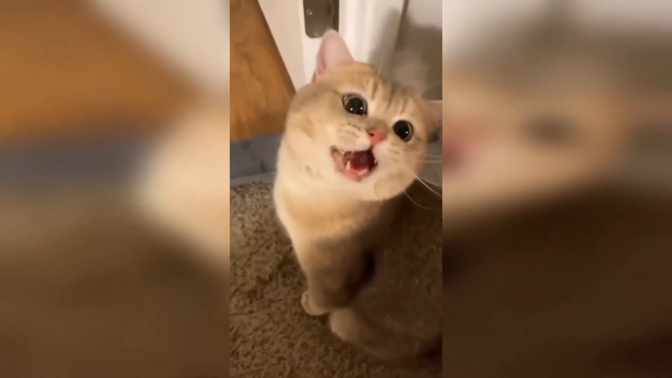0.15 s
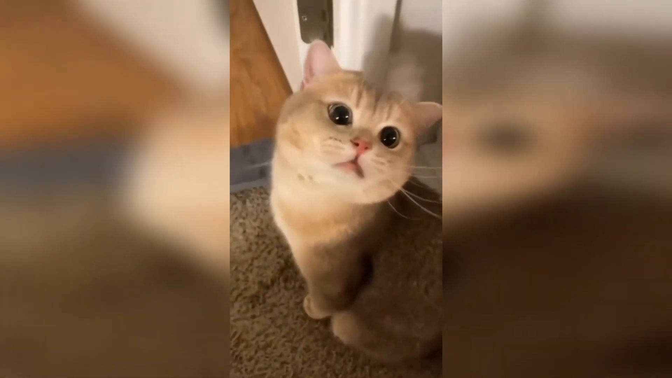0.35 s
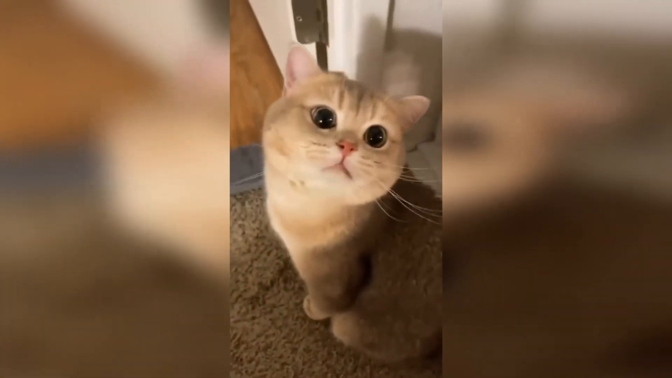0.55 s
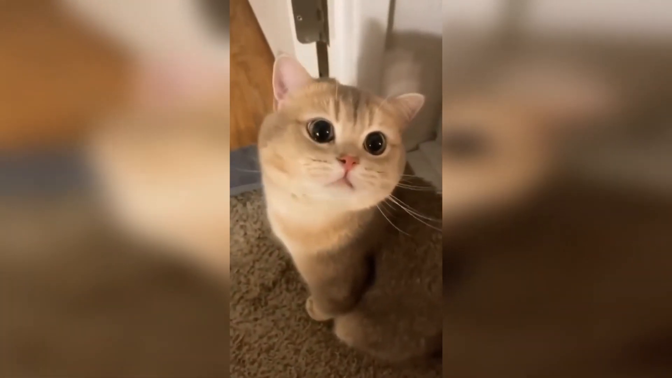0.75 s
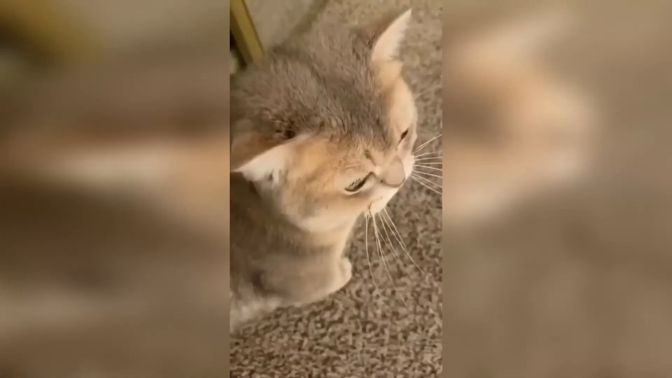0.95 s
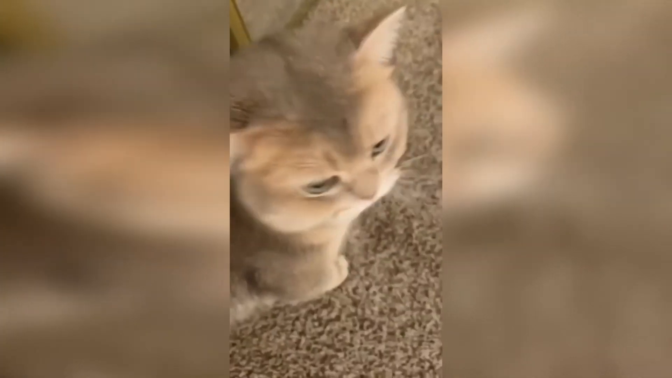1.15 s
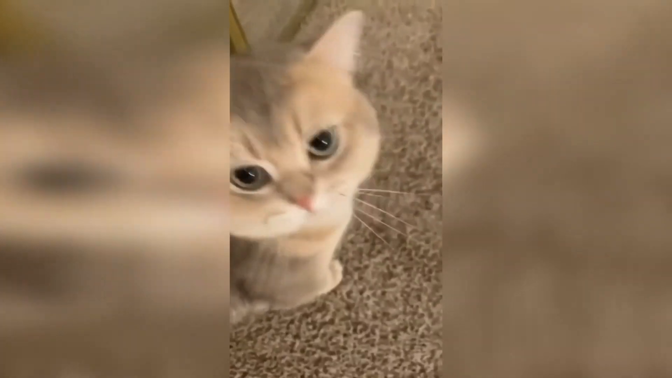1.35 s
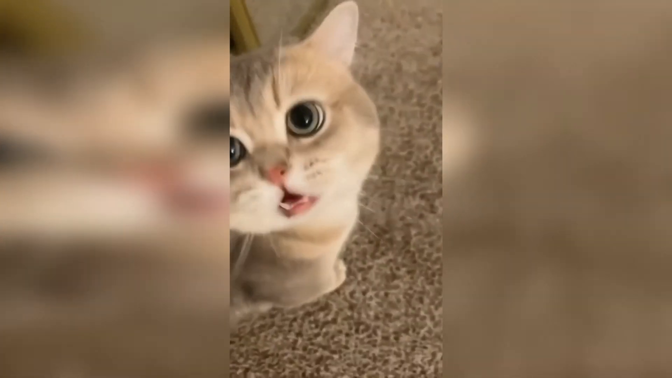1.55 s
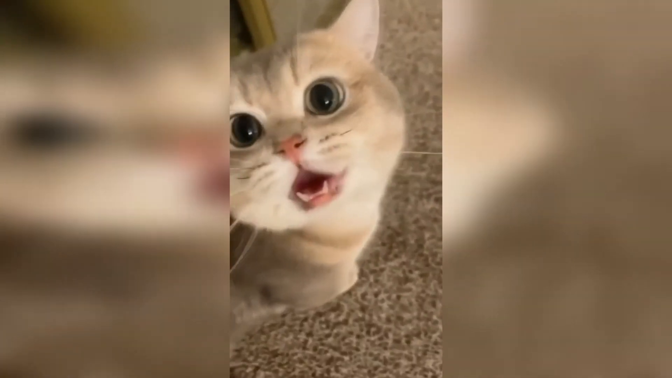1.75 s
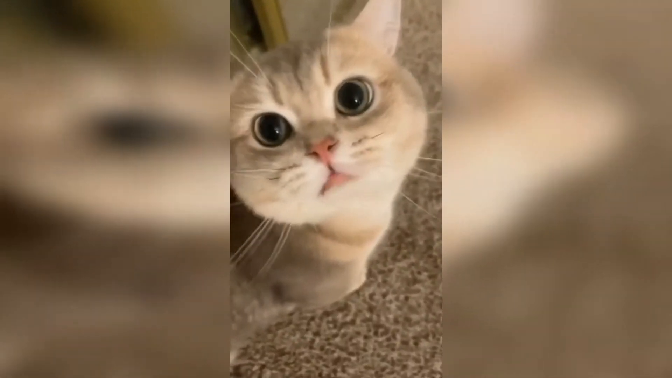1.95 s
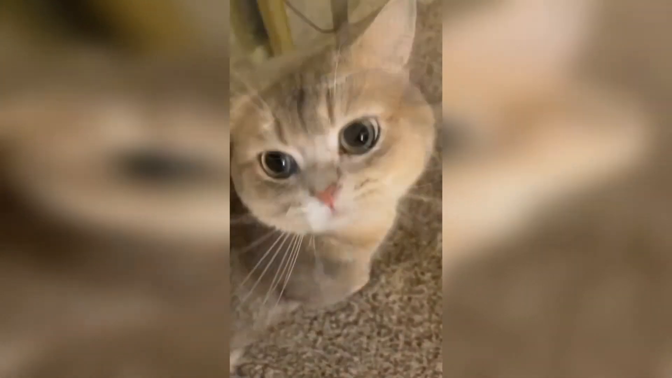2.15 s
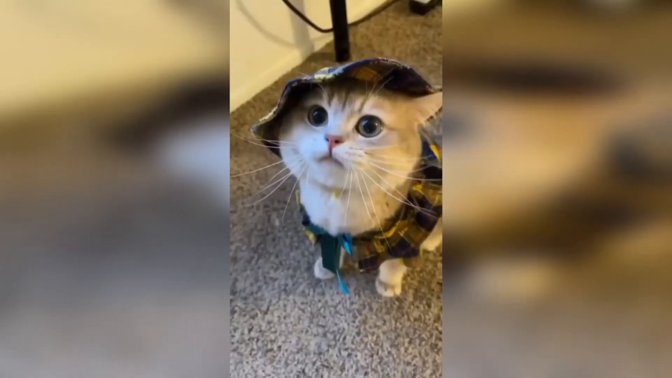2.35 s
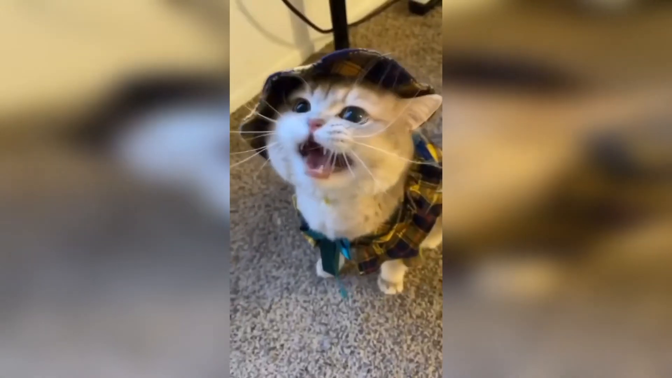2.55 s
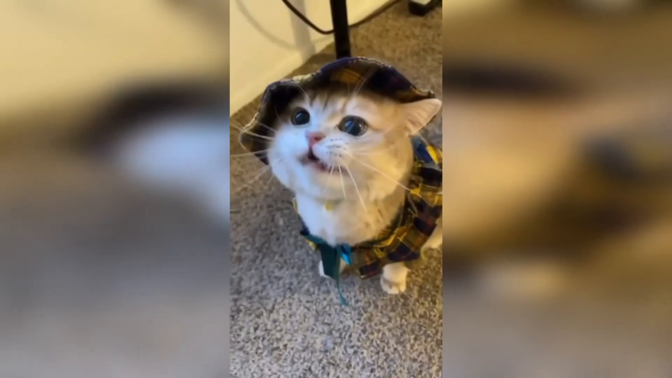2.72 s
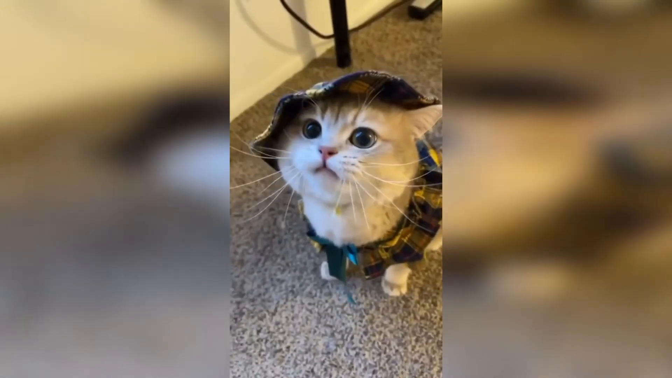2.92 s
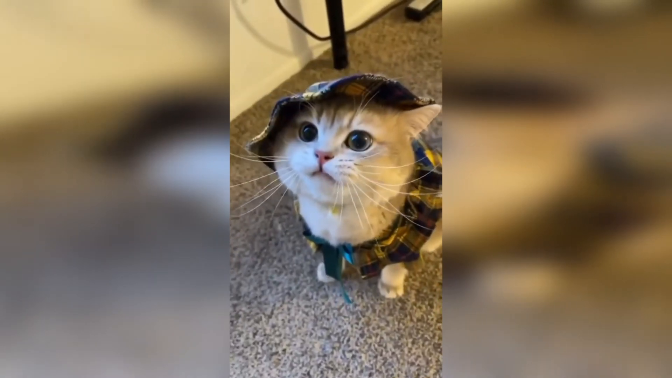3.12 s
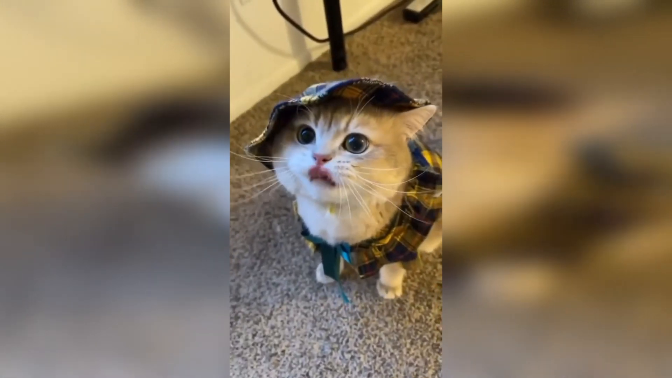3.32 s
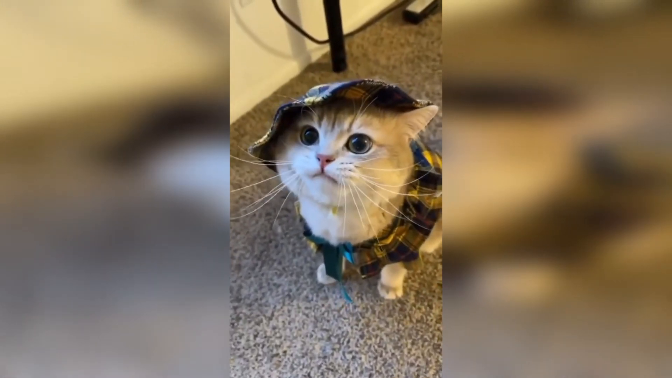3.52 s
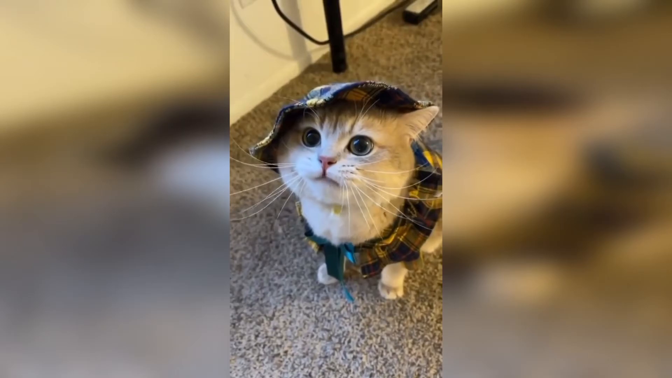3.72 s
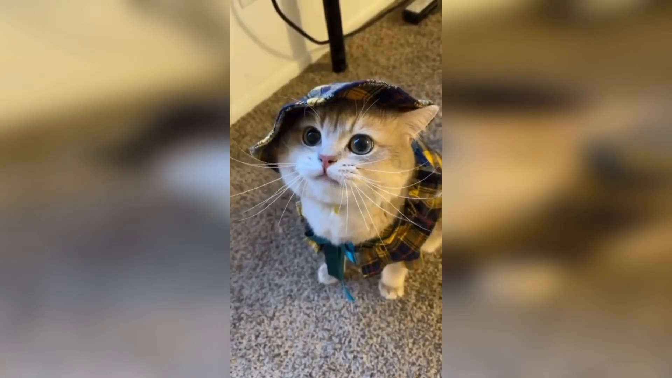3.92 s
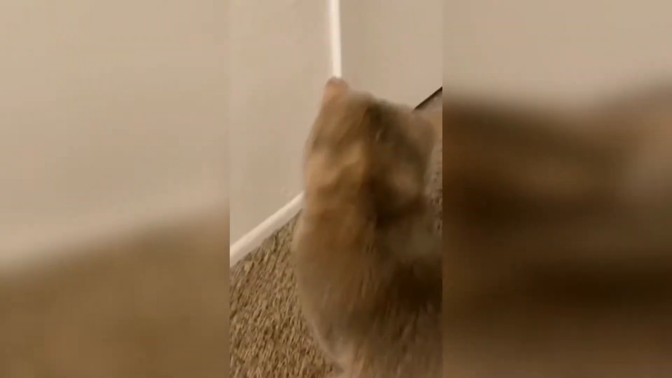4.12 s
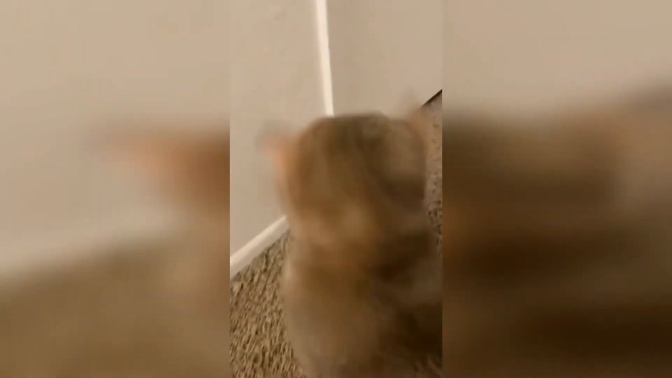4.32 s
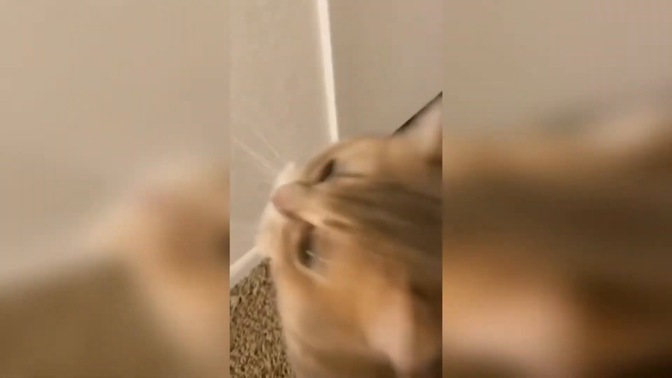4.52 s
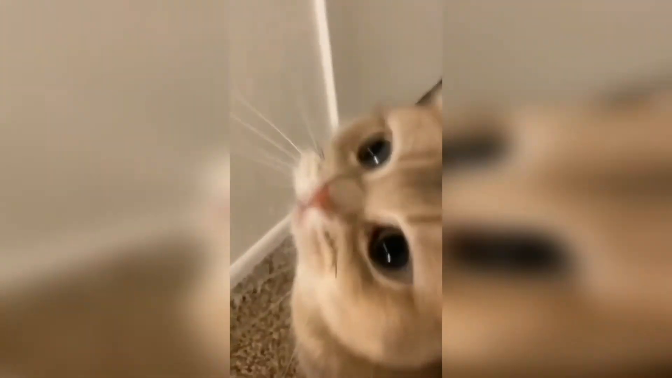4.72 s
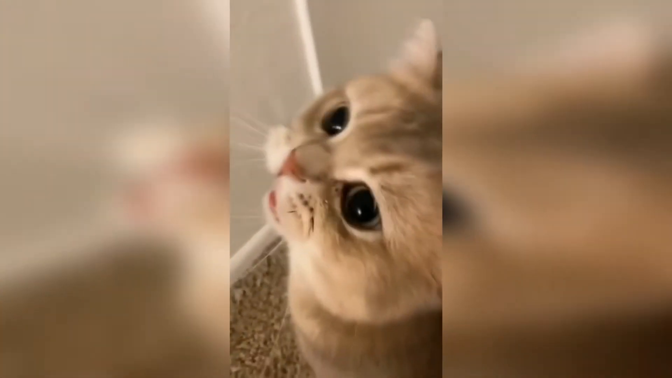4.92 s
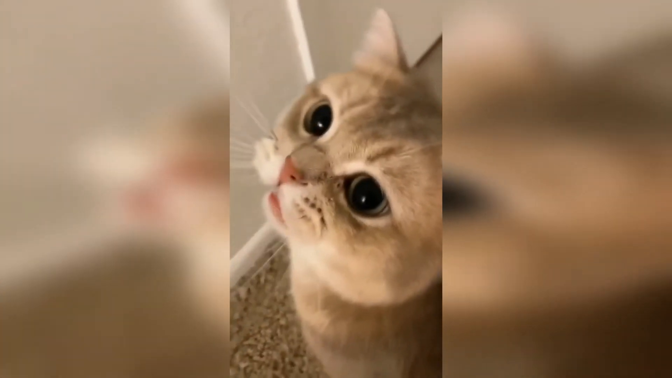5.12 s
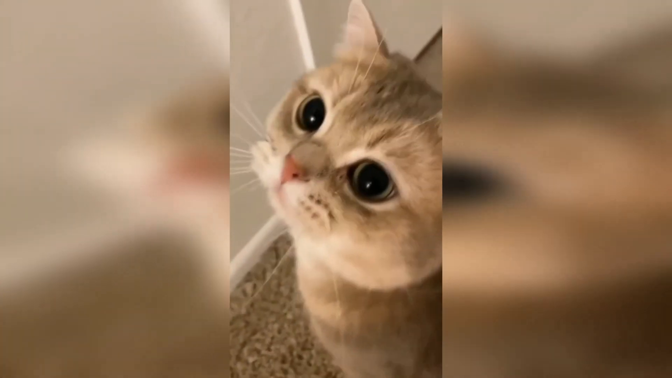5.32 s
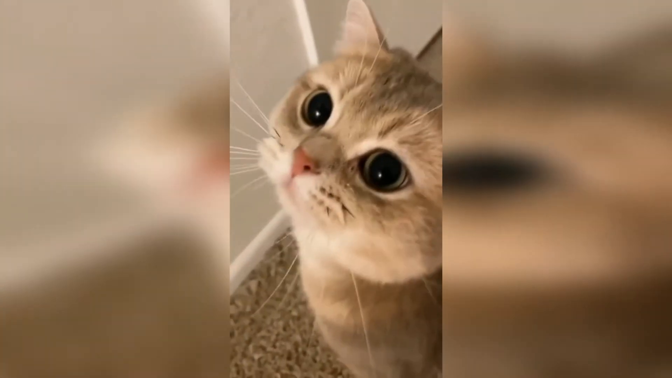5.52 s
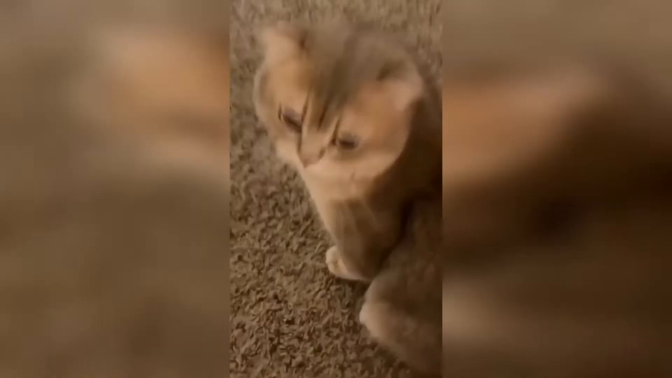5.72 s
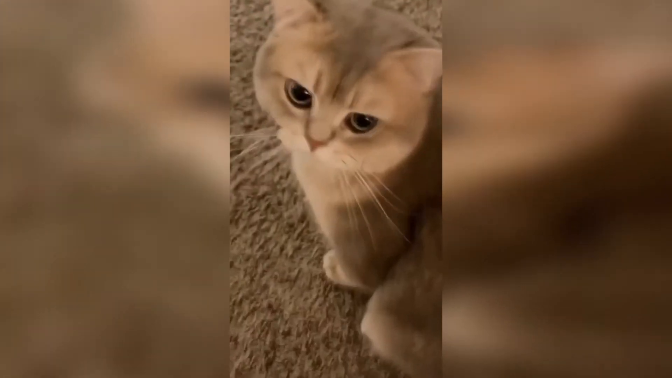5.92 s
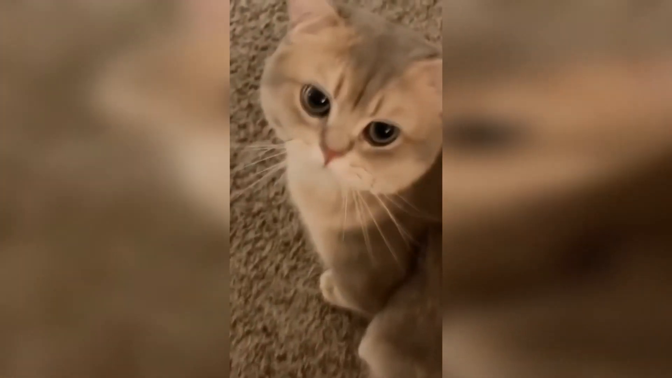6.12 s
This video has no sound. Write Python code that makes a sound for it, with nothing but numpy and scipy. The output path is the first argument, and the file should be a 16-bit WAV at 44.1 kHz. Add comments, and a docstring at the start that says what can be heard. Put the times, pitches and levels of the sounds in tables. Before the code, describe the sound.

Five close cat meows in small carpeted rooms, trilled and slightly raspy, with rumble, hiss, motor hum and tiny ticks between calls.

```python
"""A cat close to a phone meows five times, trilling in all but the first call.
Vocal folds give a stack of partials shaped by throat, nose and opening mouth, with flutter and rasp.
Each call sits in another carpeted room, with hard cuts between; each room has its own rumble,
hiss and hum. Small ticks of tongue, lips and claws fall mostly between the calls; a short dull echo follows."""
import sys
import numpy as np
from scipy import signal
from scipy.fft import rfft, irfft
from scipy.io import wavfile
from scipy.ndimage import uniform_filter1d

SR = 44100
rng = np.random.default_rng(int(sys.argv[2]) if len(sys.argv) > 2 else 0)


def boost_factor(decibels):
    """Convert a level in decibels to a linear amplitude factor."""
    exponent = np.asarray(decibels, float) / 20
    return 10 ** exponent


def transcribe(u):
    """Save the signal u as a 16-bit wav file named by the first command-line argument.

    u: samples, shape (n,) or (channels, n), limited to [-1, 1]; the rate is SR.
    q: integer samples, one column per channel.
    """
    v = np.clip(np.atleast_2d(u).T, -1, 1)
    q = np.round(v * 32767).astype(np.int16)
    wavfile.write(sys.argv[1], SR, q)


N = 276066
T = np.arange(N) / SR


def colour(points, hz):
    """dB of a spectrum at the given frequencies, interpolated over log frequency."""
    f, db = np.transpose(points)
    return np.interp(np.log(np.maximum(hz, 1)), np.log(f), db)


def noise(points, size):
    """Noise of the given spectrum, rms 1."""
    gain = boost_factor(colour(points, np.fft.rfftfreq(size, 1 / SR)))
    y = irfft(rfft(rng.standard_normal(size)) * gain, size)
    return y / np.std(y)


def walk(rate_hz, size):
    """Smooth random curve changing about rate_hz times a second, spread 1."""
    k = int(SR / rate_hz)
    y = uniform_filter1d(uniform_filter1d(rng.standard_normal(size), k), k)
    return y / np.std(y)


def fade(t, start_s, end_s, rise_s, fall_s):
    """Linear gate from start to end."""
    return np.clip((t - start_s) / rise_s, 0, 1) * np.clip((end_s - t) / fall_s, 0, 1)


def tone(rows):
    """Low sine following rows of (time_s, pitch_hz, level_db), wavering in both."""
    s, hz, db = np.transpose(rows)
    pitch_hz = np.interp(T, s, hz) + 1.9 * walk(15, N)
    phase = 2 * np.pi * np.cumsum(pitch_hz) / SR
    level = np.sqrt(2) * boost_factor(np.interp(T, s, db) + 2.9 * walk(14, N))
    return level * np.sin(phase) * fade(T, s[0] - .02, s[-1] + 0.0199, 0.026, 0.023)


BEATING_HZ, BEATS_PER_S, WEAKER_RATIO = 57.2, 2.35, .6


def beating(start_s, end_s, first_db, last_db, crest_s):
    """Rows for tone(): a hum whose level beats as two unequal motors drift in and out of step."""
    s = np.arange(start_s, end_s, .01)
    beat = np.abs(1 + WEAKER_RATIO * np.exp(2j * np.pi * BEATS_PER_S * (s - crest_s)))
    level_db = np.interp(s, [start_s, end_s], [first_db, last_db]) + 20 * np.log10(beat)
    return np.c_[s, BEATING_HZ + 0 * s, level_db]


# rooms: start_s, end_s
ROOM_SPANS = [(0, .845), (.85, 2.11), (2.112, 3.987), (3.988, 5.636), (5.64, 6.3)]
# cut-off time per room: fall_s
CUT_S = [.003, .003, .0003, .001, .001]
# steady noise spectrum per room: freq_hz, relative_db
ROOM_NOISE = [
    [(15, -47.5), (25, -18), (55, -5), (155, -15), (201, -26), (339, -15), (543, -34), (651, -35),
     (742, -44.5), (1220, -37), (1580, -45.5), (4980, -64.5), (6470, -39.5), (8840, -83), (12700, -65),
     (16600, -99.5), (22000, -120)],
    [(15, -46), (25, -20.5), (129, -0.5), (298, -21), (377, -14.5), (651, -40.5), (963, -27), (2160, -47),
     (2730, -38), (4850, -52), (11800, -48), (12700, -51), (16600, -85.5), (22000, -120)],
    [(15, -51.5), (25, -17.5), (42, -1.5), (64, -2), (136, -16.5), (236, -20), (306, -41), (348, -39),
     (587, -56), (5390, -68.5), (10900, -68), (12700, -72.5), (16600, -104), (22000, -120)],
    [(15, -18), (25, -19), (48, 5.5), (85, -8.5), (123, 5.5), (151, -13.5), (242, -14.5), (290, -25),
     (358, -23.5), (4370, -59), (7370, -66.5), (12700, -67), (16600, -101), (22000, -120)],
    [(15, -38), (25, -9), (123, -1.5), (212, -12.5), (298, -3.5), (515, -15.5), (1280, -25), (1460, -24),
     (3040, -30.5), (4980, -46), (11200, -40.5), (12700, -52), (16600, -87.5), (22000, -120)],
]
# noise levels per room: rumble_first_db, rumble_last_db (both at 68-104 Hz), hiss_first_db, hiss_last_db
ROOM_DB = [(-47, -44.5, -46, -49), (-62, -64, -59, -66), (-47, -49.5, -60, -57.5), (-43, -45, -48.5, -51.5),
           (-52, -50, -48.5, -49.5)]
# appliance tones per room: freq_hz, level_db, waver_db; motors near 53 and 59 Hz beat in the fourth
HUM = [
    [(352, -53, 4.)],
    [(120, -54, 4.5)],
    [],
    [(53, -37.5, 1.5), (59.5, -33, 0.6), (105, -55, 6), (120, -58, 1.5), (120.2, -32.5, 0), (180, -48, 1.1),
     (237.8, -44, 1.6), (305, -57.5, 1), (361, -53, 2.1), (534, -60, 3.), (590, -60.5, 4.5)],
    [(118.5, -56.5, 3.)],
]
# motor hum of the first and third rooms: start_s, end_s, first_db, last_db, crest_s
BEATING_HUM = [(0, .845, -38, -38.5, .05), (2.112, 3.987, -35, -42, 2.31)]
# low passing tone: time_s, pitch_hz, level_db
DRONE = [(2.2, 157, -44), (2.3, 152, -42.5), (2.7, 152.6, -42.5), (2.85, 159.4, -48.5), (3.1, 159.6, -58.5)]
IN_STEP_S = 4.24  # appliance tones all crest here
RUMBLE_WALK_DB, HISS_WALK_DB = 2.5, 2
# a soft shuffle lifts the second room's noise
SHUFFLE_S, SHUFFLE_LENGTH_S, SHUFFLE_DB, SHUFFLE_HISS_DB = 1.08, .07, 17, 6


def rooms():
    """Rumble and hiss as split noise, appliance tones as sines; each room but the first fades in."""
    out = np.zeros(N)
    low = signal.butter(4, 260, fs=SR, output="sos")
    gauge = signal.butter(4, [68, 104], "band", fs=SR, output="sos")
    shuffle = np.exp(-((T - SHUFFLE_S) / SHUFFLE_LENGTH_S) ** 2)
    swelling = sum(tone(rows) for rows in [beating(*hum) for hum in BEATING_HUM] + [DRONE])
    for room, ((start, end), points, levels) in enumerate(zip(ROOM_SPANS, ROOM_NOISE, ROOM_DB)):
        inside = (T >= start) & (T < end)
        t = T[inside]
        air = noise(points, len(t))
        rumble = signal.sosfiltfilt(low, air)
        hiss = air - rumble
        rumble_db = np.interp(t, [start, end], levels[:2]) + SHUFFLE_DB * shuffle[inside]
        rumble_db += RUMBLE_WALK_DB * walk(5, len(t))
        hiss_db = np.interp(t, [start, end], levels[2:]) + SHUFFLE_HISS_DB * shuffle[inside]
        hiss_db += HISS_WALK_DB * walk(12, len(t))
        sound = swelling[inside]
        for hz, db, waver_db in HUM[room]:
            level = np.sqrt(2) * boost_factor(db + waver_db * walk(8, len(t)))
            sound += level * np.cos(2 * np.pi * hz * (t - IN_STEP_S))
        sound += boost_factor(rumble_db) * rumble / np.std(signal.sosfiltfilt(gauge, air))
        sound += boost_factor(hiss_db) * hiss / np.std(hiss)
        out[inside] = sound * fade(t, start - (room == 0), end, 0.022, CUT_S[room])
    return out


# echo per call: send_db
ECHO_DB = [-24, -27.5, -26.5, -25.5, -28]
ECHO_T60_S, SEND_WALK_HZ, TICK_ECHO_DB = .24, 45, -26


def echo(calls, clicks):
    """Walls as a decaying noise tail; calls are randomly modulated first, so their tails sound diffuse."""
    t = T[:SR // 2]
    tail = noise([(150, -6.5), (500, 0.5), (3000, -4), (12000, -20.5)], len(t))
    tail = tail * boost_factor(-60 * t / ECHO_T60_S) * (t > .004)
    sent = sum(boost_factor(db) * call for db, call in zip(ECHO_DB, calls)) * walk(SEND_WALK_HZ, N)
    sent = sent + boost_factor(TICK_ECHO_DB) * clicks
    return signal.fftconvolve(sent, tail / np.sqrt(np.sum(tail ** 2)))[:N]


# ticks of tongue, lips and claws: start_s, level_db, centre_hz, width_hz, rustle_db (against level)
TICKS = [(1.034, -40, 1000, 1000, -9), (1.0859, -29, 1370, 2202, -13), (1.9754, -34, 2480, 2539, -21.5),
         (2.0263, -44, 2210, 2000, -16.5), (2.345, -11.5, 5500, 8020, -12),
         (3.2364, -44.5, 2500, 2990, -19.5), (3.2542, -38.5, 2370, 2600, -12),
         (3.4336, -44, 3974, 4996, -20), (3.4578, -24.5, 10500, 2996, -16),
         (3.4589, -37, 5850, 7130, -23.5), (3.5622, -44.5, 3000, 4000, -14), (3.5863, -49, 10500, 3000, -9),
         (3.6355, -41.5, 2774, 3570, -13.5), (3.7354, -48, 6460, 2000, -3), (3.7681, -38, 6530, 3950, -13),
         (3.7845, -29.5, 2630, 2335, -14), (3.7944, -29, 7670, 6890, -12), (4.654, -22, 6027, 8910, -4),
         (5.2852, -42, 2000, 2525, -22), (5.3034, -30.5, 3010, 3503, -19), (5.8322, -49, 2795, 2600, 4),
         (6.123, -49.5, 6000, 9000, 2)]
SNAP_DECAY_S, SNAP_RISE_S, RUSTLE_T60_S = 0.0017, 0.0015, 0.12
KNOCK_HZ, KNOCK_DB, KNOCK_T60_S = 2100, -5.5, 0.02


def ticks():
    """Band noise as a sharp snap and short rustle; a damped knock rings in ticks centred at 1.8-3.3 kHz."""
    out, t = np.zeros(N + SR), T[:SR // 4]
    knock = boost_factor(KNOCK_DB - 60 * t / KNOCK_T60_S) * np.sin(2 * np.pi * KNOCK_HZ * t)
    snap = np.exp(-t / SNAP_DECAY_S) * np.minimum(t / SNAP_RISE_S, 1) * 1.5
    for s, db, hz, width_hz, rustle_db in TICKS:
        band_hz = [max(hz - width_hz / 2, 500), min(hz + width_hz / 2, 15000)]
        sos = signal.butter(2, band_hz, "band", fs=SR, output="sos")
        grain = signal.sosfilt(sos, rng.standard_normal(len(t)))
        rustle = boost_factor(rustle_db - 60 * t / RUSTLE_T60_S + 3.5 * walk(60, len(t)))
        click = (snap + rustle) * grain / np.std(grain) / 2 + knock * (1800 < hz < 3300)
        i = int(s * SR)
        out[i:i + len(t)] += boost_factor(db) * click
    return out[:N]


# the jaw raises the throat resonance
THROAT_SHUT_HZ, THROAT_WIDE_HZ, THROAT_Q, THROAT_TOP_HZ = 330, 1320, 2.3, 1750
FOLD_TILT_DB_PER_OCT = 3
# the nose swallows this band; the notch fills over the last part of the jaw's drop
NOTCH_HZ, NOTCH_WIDTH_HZ, NOTCH_DB, NOTCH_GONE_JAW = 1520, 420, -22, 0.36


def throat(k, hz, jaw):
    """Gain of partial k: fold tilt, throat resonance with a steep top, nasal notch."""
    ratio = k * hz / (THROAT_SHUT_HZ * (THROAT_WIDE_HZ / THROAT_SHUT_HZ) ** jaw)
    notch_db = NOTCH_DB * np.clip((1 - jaw) / NOTCH_GONE_JAW, 0, 1)
    notch_db = notch_db / (1 + (2 * (k * hz - NOTCH_HZ) / NOTCH_WIDTH_HZ) ** 2)
    top = np.hypot(1, (k * hz / THROAT_TOP_HZ) ** 6)
    tilt_db = FOLD_TILT_DB_PER_OCT * np.log2(k)
    return boost_factor(tilt_db + notch_db) / np.hypot(1 - ratio ** 2, ratio / THROAT_Q) / top


# trills: first_s, last_s, period_ms, first_depth_db, last_depth_db
TRILLS = [(1.234, 1.4, 32.5, 13, 5), (2.209, 2.3, 18, 8, 3), (2.449, 2.63, 25.5, 3.5, 5),
          (4.441, 4.6, 22.1, 11, 6), (6.028, 6.149, 23.6, 10, 6)]
# single catches of the voice: time_s, depth_db, length_ms
CATCHES = [(2.3383, 5, 7.5), (4.368, 8, 14), (4.429, 10.5, 10.6), (5.1102, 3.5, 9.8), (5.1429, 13, 4.2)]
TRILL_DUTY, TRILL_SCATTER = .42, .3  # share of the period; unevenness of depth


def falter(t):
    """Depth in dB by which the folds falter: bell-shaped dips, steady in trills, single in catches."""
    db = sum(depth * np.exp(-(2 * (t - at) * 1000 / ms) ** 2) for at, depth, ms in CATCHES)
    uneven = np.maximum(1 + TRILL_SCATTER * walk(40, len(t)), 0)
    for first, last, ms, *depths in TRILLS:
        beat = (t - first) * 1000 / ms
        within = (beat > -.5) & (t < last + ms / 2000)
        dip = np.exp(-(2 * (beat - np.round(beat)) / TRILL_DUTY) ** 2)
        db = db + within * uneven * np.interp(t, [first, last], depths) * dip
    return db


# upper tract, lips shut: freq_hz, relative_db
NOSE = [(1650, -32.5), (2800, -2), (3080, -11), (3770, -13.5), (4340, -1.5), (4890, -15), (6300, -14.5),
        (6420, -12), (8070, -24.5), (9890, -18), (12700, -26), (16600, -56), (22000, -120)]
SHUT_DB, OPEN_DB = -23.5, -8  # mouth level at which the lips count as shut, open
MOUTH_OPEN_WIDTH_HZ, MOUTH_SKIRT, SHUT_WIDEN = 415, 1.96, 0.44
# second resonance, offset above the mouth's; shut lips lower it further
SECOND_ABOVE_HZ, SECOND_DB, SECOND_SHUT_DB = 650, -15, -14
NASAL_HZ, NASAL_WIDTH_HZ, NASAL_DB = 1080, 760, -14.5  # rings behind shut lips
FLUTTER_LIFT_PER_DB, JITTER, SHIMMER_DB = .012, .015, 3  # the last two at full hoarseness
RASP_HZ, AIR_HZ, RASP_GROWTH, RASP_START = 248, 550, 0.34, .75  # smear rates; growth per partial
FALTER_BASE, FALTER_GROWTH = 0.64, 0.05  # share of the falter depth; growth per partial


def meow(start, end, rows, rasp, bright, treble):
    """Partials of the folds through throat and mouth; they falter in trills and smear into rasp if hoarse."""
    inside = (T >= start) & (T <= end)
    t = T[inside]
    size = len(t)
    s, *columns = np.transpose(rows)
    hz, level_db, jaw, mouth_hz, mouth_db = (np.interp(t, s, c) for c in columns)
    hoarse = np.interp(t, *np.transpose(rasp))
    treble_db = np.interp(t, *np.transpose(bright))
    opening = np.clip((mouth_db - SHUT_DB) / (OPEN_DB - SHUT_DB), 0, 1)
    shut = 1 - opening
    falter_db = falter(t)
    low = np.hypot(throat(1, hz, jaw), throat(2.02, hz, jaw))  # reference for level_db
    pitch_hz = hz * (1 + FLUTTER_LIFT_PER_DB * falter_db + JITTER * hoarse * walk(150, size))
    phase = 2 * np.pi * np.cumsum(pitch_hz) / SR
    shimmer = boost_factor(SHIMMER_DB * hoarse * walk(220, size))
    width_hz = MOUTH_OPEN_WIDTH_HZ * (1 + SHUT_WIDEN * shut)
    resonances = ((0, 0), (SECOND_ABOVE_HZ, SECOND_DB + SECOND_SHUT_DB * shut))
    voice = 0
    for k in range(1, 36):
        f = k * hz
        mouth = 0
        for above_hz, db in resonances:
            detune = 2 * (f - mouth_hz - above_hz) / width_hz
            mouth = mouth + boost_factor(mouth_db + db) / (1 + detune ** 2) ** (MOUTH_SKIRT / 2)
        if k < 5:
            nasal = shut * boost_factor(NASAL_DB) / (1 + (2 * (f - NASAL_HZ) / NASAL_WIDTH_HZ) ** 4)
            gain = throat(k, hz, jaw) / low + (mouth + nasal) * (k > 2)
        else:
            upper_db = treble_db + opening * colour(treble, f) + shut * colour(NOSE, f)
            upper = boost_factor(upper_db) * (f > 2700) * (f < 15500)
            gain = (mouth + upper) * boost_factor(1.6 * walk(25, size))
        # uneven cycles smear high partials first; behind shut lips the treble is only air
        clear = (1 - hoarse) ** (RASP_GROWTH * max(k - RASP_START, 0)) * (opening if k > 7 else 1)
        rate_hz = RASP_HZ if k < 8 else AIR_HZ
        smear = (walk(rate_hz, size) + 1j * walk(rate_hz, size)) / np.sqrt(2)
        carrier = np.exp(1j * (k * phase + .35 * k ** 2))
        partial = (np.sqrt(clear) + np.sqrt(1 - clear) * smear) * carrier
        dip = boost_factor(-falter_db * (FALTER_BASE + FALTER_GROWTH * min(k - 1, 5)))
        voice = voice + gain * dip * partial.imag
    out = np.zeros(N)
    out[inside] = -np.sqrt(2) * boost_factor(level_db) * shimmer * voice
    # no fade-in on the first call, no fade-out on the last
    return out * fade(T, start - (start < .01), end + (end > 6.2), .006, .01)


# calls: start_s, end_s
CALL_SPANS = [(0, .31), (1.21, 1.765), (2.185, 2.86), (4.345, 5.17), (6.006, 6.26)]
# voice per call: time_s, pitch_hz, level_db, jaw_drop (0-1), mouth_hz, mouth_db (against level)
VOICE = [
    [(0, 472, -20.5, 0.96, 2300, 1.5), (.064, 463.2, -21, 0.97, 2290, 2.5),
     (.098, 452.5, -19.5, .72, 2370, -4.5), (.154, 444.4, -20.5, .68, 2530, -3),
     (.208, 459.8, -20.5, 0.61, 2570, -11.5), (.228, 569, -27.5, 0.95, 2530, -16),
     (.25, 616, -48, 0.83, 2460, 3.5), (.31, 618, -64.5, 0.8, 2320, 2)],
    [(1.21, 444, -52.5, .1, 2460, -13), (1.22, 410, -25.5, 0.3, 2400, -20),
     (1.25, 368, -15, 0.23, 2420, -31), (1.26, 358.5, -18, 0.18, 2430, -25.5),
     (1.38, 363.3, -18.5, 0.22, 1950, -23.5), (1.43, 390.3, -19.5, 0.41, 1940, -12),
     (1.468, 400.2, -17.5, .48, 2310, -11), (1.5, 419.7, -18, .6, 2510, -1.5),
     (1.554, 424.5, -17.5, 0.55, 2390, 3.5), (1.682, 454.9, -18.5, 0.6, 2480, -4),
     (1.715, 442, -17.5, 0.54, 2450, -11.5), (1.74, 423.3, -17, 0.46, 2410, -21),
     (1.765, 431.6, -45.5, 0.4, 2390, -13)],
    [(2.185, 379.8, -39, .1, 1880, -20), (2.209, 372, -27.5, 0.45, 1850, -15),
     (2.263, 355, -21.5, 0.41, 2000, -17), (2.283, 385, -14, .5, 2150, -21),
     (2.309, 416.8, -12, .55, 2270, -23.5), (2.342, 435, -13, 0.5, 2348, -10.5),
     (2.352, 452.7, -19, 0.87, 2360, 2), (2.388, 460.9, -22, 0.92, 2220, 12),
     (2.435, 433, -20, .8, 2350, 1.5), (2.464, 416.1, -19, 0.79, 2440, -0.3),
     (2.514, 405, -18.5, 0.68, 2300, -2), (2.604, 387, -17.5, 0.57, 2150, -17.5),
     (2.655, 365.6, -18, .65, 1970, -8.5), (2.672, 376.3, -20.5, 0.53, 1920, -6.5),
     (2.688, 425.2, -20, .65, 1980, -10), (2.72, 448.7, -19, 0.61, 2130, -12.5),
     (2.743, 550, -20, 0.8, 2170, -26.5), (2.783, 525.4, -23, 0.73, 2160, -26),
     (2.803, 526.5, -26.5, 0.58, 2160, -27.5), (2.817, 533.5, -40, 0.17, 2150, -23),
     (2.86, 535, -55, 0.3, 2150, -21)],
    [(4.345, 465.8, -49.5, .15, 2010, -12), (4.355, 438.5, -28, 0, 2020, -38),
     (4.378, 379.8, -44, .05, 2060, -17), (4.386, 328.6, -25, 0.18, 2060, -28),
     (4.485, 331.2, -17, 0.16, 1910, -24.5), (4.513, 322.4, -18, 0.19, 1980, -24.5),
     (4.561, 356.7, -13, .25, 1870, -24), (4.7, 374.8, -14, 0.27, 1900, -12.5),
     (4.718, 392.3, -16, 0.36, 2180, -5.5), (4.74, 394.2, -19, 0.49, 2170, 3),
     (4.828, 411.2, -20.5, .45, 2100, 4), (4.926, 429, -16, .58, 2310, -2),
     (4.98, 439, -16.5, 0.59, 2280, -4.5), (5.06, 428, -14.5, 0.53, 2250, -11),
     (5.095, 393, -16.5, 0.43, 2000, -10.5), (5.127, 510.8, -20.5, 0.5, 2000, -13),
     (5.17, 425.5, -40, .05, 2020, -22)],
    [(6.008, 450.7, -30.5, .05, 2010, -35), (6.036, 440.2, -27.5, .3, 1900, -38),
     (6.058, 364, -26, 0.22, 1850, -32), (6.136, 349, -27, 0.26, 1800, -22),
     (6.19, 380, -24.5, .28, 1980, -42), (6.211, 504.3, -21.5, 0.4, 2050, -54),
     (6.26, 540.2, -26, 0.4, 2110, -38)],
]
# break-up into rasp per call: time_s, hoarseness (0-1)
HOARSE = [
    [(0, .015), (.19, .03), (.22, .5), (.25, .95)],
    [(1.21, .45), (1.37, .35), (1.44, .02), (1.71, .015), (1.75, .6)],
    [(2.19, .9), (2.27, .55), (2.36, .04), (2.45, .15), (2.55, .12), (2.79, .13), (2.82, .5)],
    [(4.345, .6), (4.54, .55), (4.61, .25), (4.68, .15), (4.73, .012), (5.05, .02), (5.075, .45),
     (5.14, .7)],
    [(6.0, .8), (6.06, .6), (6.16, .4), (6.22, .1)],
]
# treble against the call's level, per call: time_s, relative_db
TREBLE_LEVEL = [
    [(0, -9.5), (.064, -8.5), (.154, -14.5), (.205, -30), (.25, -6)],
    [(1.21, -30), (1.244, -37), (1.38, -32), (1.468, -31), (1.5, -20), (1.554, -19), (1.682, -15),
     (1.74, -32.5), (1.765, -17)],
    [(2.185, -30), (2.309, -29.5), (2.342, -22), (2.352, -6), (2.388, -4), (2.514, -9.5), (2.604, -27.5),
     (2.67, -26), (2.743, -40), (2.783, -33)],
    [(4.345, -33.5), (4.385, -33.5), (4.561, -37.5), (4.7, -24.5), (4.74, -7), (4.828, -6.5),
     (4.926, -17.5), (4.98, -18), (5.06, -29), (5.127, -24)],
    [(6.008, -30), (6.058, -32.5), (6.136, -27), (6.19, -34), (6.26, -36.5)],
]
# upper tract, mouth open, per call: freq_hz, relative_db
TREBLE = [
    [(1650, -29), (2800, -2), (3720, -3), (5240, -18), (5550, -1.5), (6760, -11.5), (7110, -4.5),
     (7530, -17.5), (8330, -17.5), (8650, -32), (9640, -26.5), (11200, -23.5), (12700, -30), (16600, -59.5),
     (22000, -120)],
    [(1650, -40), (2800, -11.5), (3060, -7.5), (3630, -25), (3870, -5), (4450, -4.5), (4950, -18),
     (5700, -11), (6800, -26), (7770, -22), (8330, -39.5), (11300, -32.5), (12700, -50), (16600, -80.5),
     (22000, -120)],
    [(1650, -31), (2800, -2.5), (3220, -5.5), (4500, -13.5), (4830, -18.5), (7290, -9), (8880, -35),
     (9890, -22), (10500, -30), (11400, -25.5), (12700, -37.5), (16600, -70), (22000, -120)],
    [(1650, -38), (2800, 1), (3260, -23.5), (3800, -2), (4650, -20.5), (4890, -13.5), (5350, -14),
     (5800, -10.5), (6670, -26.5), (7340, -39.5), (8650, -29.5), (9400, -37), (12700, -40.5), (16600, -72),
     (22000, -120)],
    [(1650, -37), (2800, -13), (4650, -7), (4990, -15), (6340, -3), (12700, -17), (16600, -47),
     (22000, -120)],
]


def cat():
    """The five calls as separate signals, each with its own course of pitch, mouth and rasp."""
    shapes = zip(CALL_SPANS, VOICE, HOARSE, TREBLE_LEVEL, TREBLE)
    return [meow(*span, *shape) for span, *shape in shapes]


def scene():
    """Cat and ticks with their echo, over the rooms."""
    calls = cat()
    clicks = ticks()
    return (sum(calls) + clicks + echo(calls, clicks) + rooms())[None]


def roll_off(x):
    """The treble ends steeply here."""
    return signal.sosfilt(signal.butter(12, 12890, fs=SR, output="sos"), x)


def record(dry):
    """The phone's microphone drops the deepest bass and rounds the loudest peaks towards full scale."""
    heard = signal.sosfilt(signal.butter(2, 42, "high", fs=SR, output="sos"), dry)
    return roll_off(np.tanh(heard))


dry = scene()
out = record(dry)
transcribe(out)
```